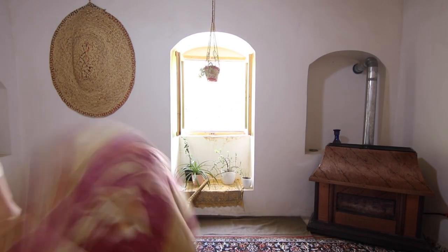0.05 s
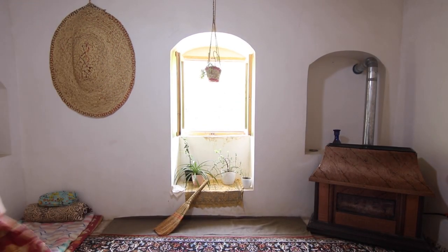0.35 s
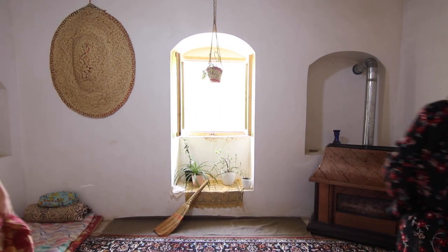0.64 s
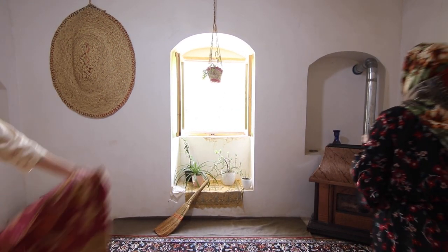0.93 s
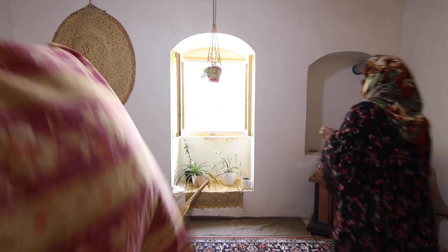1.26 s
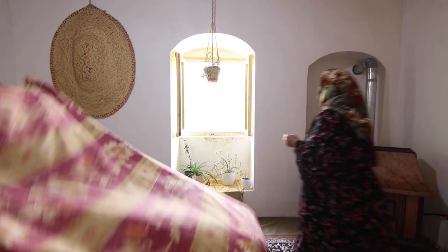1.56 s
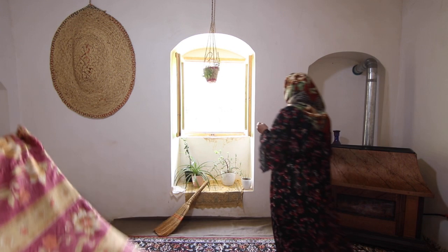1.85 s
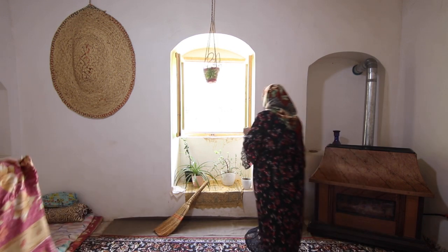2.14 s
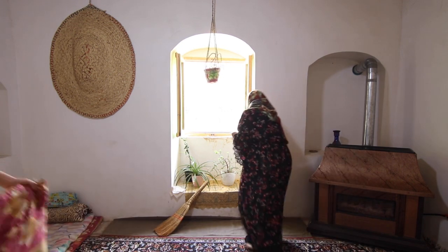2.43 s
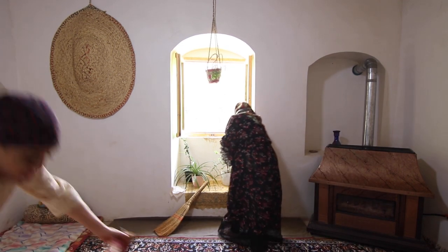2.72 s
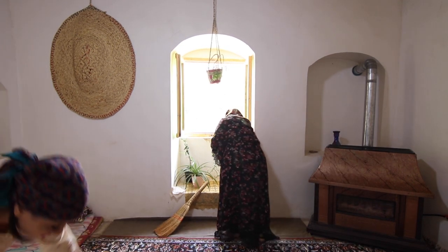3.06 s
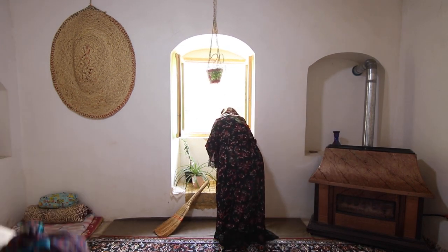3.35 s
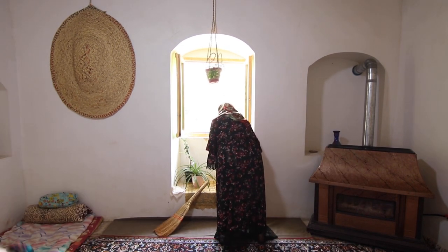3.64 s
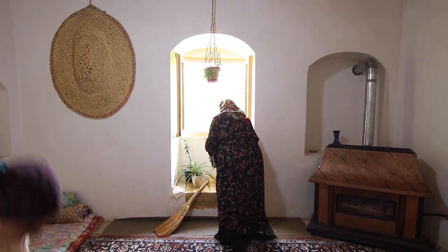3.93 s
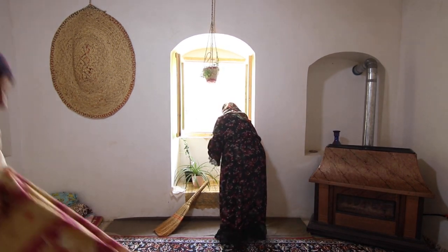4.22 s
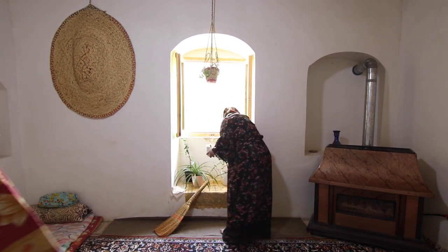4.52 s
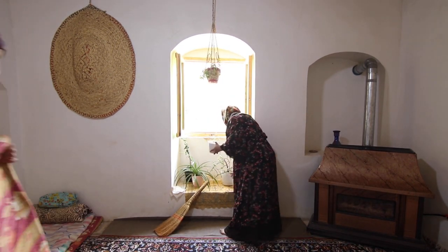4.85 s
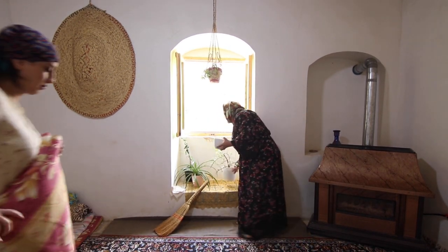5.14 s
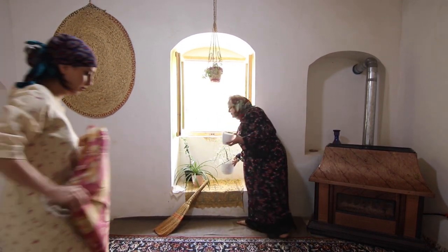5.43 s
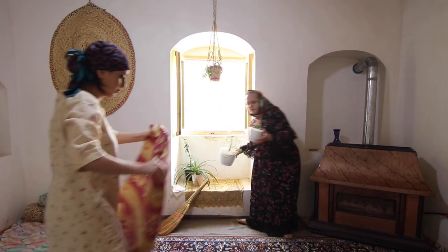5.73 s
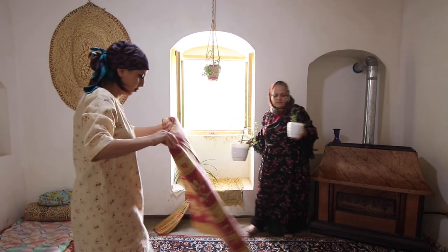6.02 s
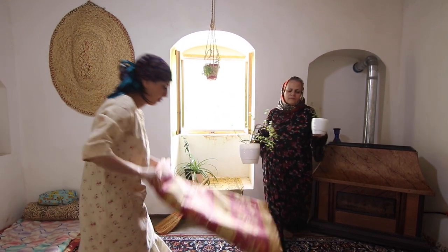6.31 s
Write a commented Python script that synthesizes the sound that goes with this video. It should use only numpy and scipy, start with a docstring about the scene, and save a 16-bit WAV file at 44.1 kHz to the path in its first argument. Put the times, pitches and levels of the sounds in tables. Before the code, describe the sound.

Several loud, padded thumps and a rush of air open the scene as thick bedding is shaken out, making a small room boom briefly. Fabric rubs and swishes in uneven strokes, with occasional dull thuds on carpet. Near the middle, a camera lens motor gives a short, dry whir with tiny clicks right at the microphone. The handling then grows gentler, ending in faint rustles and a soft footfall.

```python
"""In a small plastered room, a heavy quilt is swung, flapped and laid down on the carpet.
Friction makes the cloth rub and swish; its blows thud, push out air and excite the room's low modes,
and soft steps fall between. Halfway through, a small lens motor close to the microphone whirs and
clicks as its steps and gears drive the resonances of its housing."""
import sys
import numpy as np
from scipy import signal
from scipy.fft import rfft, irfft
from scipy.io import wavfile

SR = 44100
rng = np.random.default_rng(int(sys.argv[2]) if len(sys.argv) > 2 else 0)


def output_pcm(signal):
    """Save a mono or channel-first signal as 16-bit PCM at the path in sys.argv[1].

    Samples are clipped to [-1, 1] before scaling.
    """
    pcm = np.clip(np.atleast_2d(signal).T, -1, 1) * 32767
    wavfile.write(sys.argv[1], SR, np.round(pcm).astype(np.int16))


N = 285768
TIME = np.arange(N) / SR
HZ = np.fft.rfftfreq(N, 1 / SR)


def amp(db):
    """Decibels to amplitude ratio."""
    return 10 ** (np.asarray(db) / 20)


def unit(x):
    """Normalisation to rms 1."""
    return x / np.sqrt(np.mean(x ** 2) + 1e-20)


def curve_at(points, hz):
    """Interpolation on a log-frequency axis."""
    f, value = np.transpose(points)
    return np.interp(np.log(hz + 1), np.log(f + 1), value)


def coloured(x, spectrum):
    """Spectral shaping, at rms 1."""
    return unit(irfft(rfft(x) * amp(curve_at(spectrum, HZ)), N))


def wander(rate_hz):
    """Low-pass noise: slow random motion of rms 1."""
    return unit(irfft(rfft(rng.standard_normal(N)) * np.exp(-(HZ / rate_hz) ** 2), N))


def resonate(x, hz, width_hz):
    """A damped resonator with gain near 1 at its centre."""
    pole = np.exp(-np.pi * width_hz / SR)
    return 2 * signal.lfilter([1 - pole], [1, -pole * np.exp(2j * np.pi * hz / SR)], x).real


def band(x, hz, width_hz):
    """Two resonators in cascade: a band with steeper skirts."""
    return resonate(resonate(x, hz, width_hz), hz, width_hz)


def bell(f, centre_hz, octaves):
    """A Gaussian gain curve over log frequency."""
    return np.exp(-.5 * (np.log2(f / centre_hz) / octaves) ** 2)


def burst(rise_s, decay_s, colour, size=32768):
    """Shaped noise with exponential rise and decay; returns the time to its peak and the sound."""
    lead_s = size / SR / 4
    t = np.arange(size) / SR - lead_s
    gain = colour(np.fft.rfftfreq(size, 1 / SR) + 1)
    noise = unit(irfft(gain * np.exp(2j * np.pi * rng.random(len(gain)))))
    return lead_s, noise * np.exp(np.minimum(t / rise_s, -t / decay_s))


# Arm strokes that move the quilt: start_s, length_s, sweep_db, weave_db
ARM_STROKES = [(-0.08, 0.49, -38.5, -49), (0.06, 0.12, -41.5, -51.5), (0.38, 0.17, -47, -60),
               (0.603, 0.55, -62, -61), (0.856, 0.15, -49.5, -55.5), (1.018, 0.23, -54.5, -60),
               (1.225, 0.12, -46, -55.5), (1.42, 0.83, -57, -60), (1.916, 0.1, -43.5, -58),
               (1.937, 0.27, -59.5, -55.5), (2.383, 0.39, -64, -65), (3.603, 0.6, -58.5, -59.5),
               (3.858, 0.24, -49, -62.5), (4.288, 0.43, -56.5, -62.5), (4.514, 0.33, -57, -61),
               (4.906, 0.37, -61, -57), (5.3, 0.37, -70, -64), (5.677, 0.14, -61, -82)]
def stroke_levels(rise_s=0.077, coast_s=0.099, idle_sweep_db=-65, idle_weave_db=-73):
    """Incoherent sources add in power: overlapping strokes set the sweep and weave levels in dB."""
    sweep_power = amp(idle_sweep_db) ** 2  # held cloth is never quite still
    weave_power = amp(idle_weave_db) ** 2
    for start_s, length_s, sweep_db, weave_db in ARM_STROKES:
        t = TIME - start_s
        speed = np.clip(t / rise_s, 0, 1) * np.exp(-np.maximum(t - length_s, 0) / coast_s)
        sweep_power += (speed * amp(sweep_db)) ** 2
        weave_power += (speed * amp(weave_db)) ** 2
    return 10 * np.log10(sweep_power), 10 * np.log10(weave_power)


# Spectrum of folds sweeping the air: frequency_hz, density_db
FOLD_SPECTRUM = [(35, -18), (60, 5.5), (120, -6), (200, -2), (330, 2.5), (750, -1.5), (1300, -3),
                 (2500, -14.5), (5000, -26.5), (15000, -77)]
# Spectrum of the rubbing weave: frequency_hz, density_db
WEAVE_SPECTRUM = [(500, -20), (1500, 1.5), (3000, 2), (5300, -3), (7600, 0), (10000, -5), (13000, -7),
                  (15500, -22)]
def cloth_rustle(flutter_hz=45, snags_per_s=700, snag_spread_db=4, eddy_growth=1.96):
    """Flow noise and friction: fluttering folds sweep the air while the weave hisses and snags."""
    sweep_db, weave_db = stroke_levels()
    flutter_db = 1.46 * wander(flutter_hz)
    speed_db = sweep_db + flutter_db
    folds = coloured(rng.standard_normal(N), FOLD_SPECTRUM) * amp(speed_db)
    # only the fastest swings shed low eddies
    eddies = unit(band(rng.standard_normal(N), hz=130, width_hz=130))
    buffet = eddies * amp(-37 + eddy_growth * (speed_db - sweep_db.max()))
    snag_sizes = amp(snag_spread_db * np.minimum(rng.exponential(1, N), 4)) * rng.choice([-1, 1], N)
    snags = unit(snag_sizes * (rng.random(N) < snags_per_s / SR))
    fibres = coloured(rng.standard_normal(N) + 0.19 * snags, WEAVE_SPECTRUM)
    return folds + buffet + fibres * amp(weave_db + 2 + .5 * flutter_db)


# Cloth pulled taut: peak_s, level_db, decay_s, centre_hz
CLOTH_TUGS = [(0.22, -36.5, 0.0063, 5500), (0.343, -31, 0.0054, 4500), (1.993, -45, 0.041, 3500),
              (2.82, -50, 0.033, 8000), (3.047, -47, 0.03, 5500), (4.1, -56, 0.025, 13000),
              (4.52, -43, 0.011, 2600), (4.916, -40.5, 0.015, 4220)]
# Cloth sliding over cloth: peak_s, level_db, rise_s, decay_s
CLOTH_SLIDES = [(0.064, -46, 0.002, 0.016), (0.306, -46.5, 0.0018, 0.016), (0.368, -29.5, 0.0046, 0.014),
                (0.651, -48, 0.29, 0.0081), (0.98, -51.5, 0.075, 0.2), (1.62, -48.5, 0.012, 0.013),
                (2.25, -51.5, 0.58, 0.033), (5.54, -51, 0.0077, 0.06), (5.799, -56, 0.033, 0.04),
                (5.96, -54.5, 0.05, 0.019), (6.321, -63, 0.04, 0.04)]
def swishes(tug_octaves=2.2, slide_hz=1940, slide_octaves=0.88, soft_above_hz=13000):
    """Friction noise in short strokes: broad and bright in a tug, narrower and duller in a slide."""
    out = np.zeros(N)
    tugs = [(s, db, 0.97 * decay_s, decay_s, hz, tug_octaves) for s, db, decay_s, hz in CLOTH_TUGS]
    slides = [(*row, slide_hz, slide_octaves) for row in CLOTH_SLIDES]
    for peak_s, level_db, rise_s, decay_s, centre_hz, octaves in tugs + slides:
        def friction(f):
            """A tilted band with a treble roll-off: soft fibres give little fizz."""
            return bell(f, centre_hz, octaves) / f ** 0.52 / np.hypot(1, (f / soft_above_hz) ** 6)
        lead_s, sound = burst(rise_s, decay_s, friction)
        add(out, peak_s - lead_s, amp(level_db) * sound)
    return out


# Soft blows of bedding and feet: peak_s, level_db, rise_s, decay_s, cutoff_hz
SOFT_BLOWS = [(0.061, -31, 0.0018, 0.047, 734), (0.217, -18.5, 0.005, 0.011, 630),
              (0.23, -27, 0.002, 0.017, 800), (0.304, -26.5, 0.002, 0.014, 396),
              (0.368, -16, 0.0077, 0.0099, 517), (0.392, -23.5, 0.015, 0.039, 400),
              (1.998, -35, 0.025, 0.017, 850), (2.44, -56, 0.02, 0.071, 500),
              (3.02, -35, 0.0099, 0.035, 1000), (3.039, -27, 0.0047, 0.039, 700),
              (4.214, -36.5, 0.0012, 0.022, 1060), (4.24, -31.5, 0.0017, 0.015, 1018),
              (4.521, -41.5, 0.01, 0.027, 1310), (4.578, -48, 0.015, 0.027, 544),
              (4.921, -49.5, 0.0074, 0.024, 550), (6.469, -41.5, 0.0084, 0.04, 700)]
def thumps(low_hz=80, order=2.03, body_db=3, body_hz=560, body_octaves=0.66):
    """Cushioned impact: the padding cuts each blow's spectrum above its own cutoff; the quilt lands duller than
    feet and floor hits."""
    out = np.zeros(N)
    for peak_s, level_db, rise_s, decay_s, cutoff_hz in SOFT_BLOWS:
        def padding(f):
            """A hollow hump between a bass cut and the low-pass action of the padding."""
            body = amp(body_db * np.exp(-(np.log2(f / body_hz) / body_octaves) ** 2))
            return body / np.sqrt((1 + (f / cutoff_hz) ** (2 * order)) * (1 + (low_hz / f) ** 8))
        lead_s, sound = burst(rise_s, decay_s, padding)
        add(out, peak_s - lead_s, amp(level_db) * sound)
    return out


# Sharp knocks within the blows: peak_s, level_db, half_width_s, ring_db
FLOOR_KNOCKS = [(0.37, -8.5, 0.00063, -39.5), (3.0406, -20, 0.0002, -30.5), (4.239, -24, 0.00018, -55),
                (4.52, -26.5, 0.00014, -64)]
def knocks(floor_hz=166, floor_decay_s=0.035):
    """Impulse excitation: a hand or heel gives one pressure pulse, and the floor rings under it."""
    out = np.zeros(N)
    t = np.arange(-256, 256) / SR
    after = np.arange(SR // 2) / SR
    ring = np.sin(2 * np.pi * floor_hz * after) * np.exp(-after / floor_decay_s)
    for peak_s, level_db, half_width_s, ring_db in FLOOR_KNOCKS:
        pulse = (1 - (t / half_width_s) ** 2) * np.exp(-.5 * (t / half_width_s) ** 2)
        add(out, peak_s + t[0], amp(level_db) * pulse)
        add(out, peak_s, amp(ring_db) * ring)
    return out


# Air pushed out from under a falling weight: start_s, level_db, pitch_hz
AIR_PUSHES = [(0.073, -21, 152), (0.214, -30, 75.4), (0.365, -8, 191), (0.367, -16, 79.4), (1.56, -46, 87),
              (1.989, -32.5, 128), (3.039, -36, 93), (3.569, -46, 103), (4.22, -55, 56.4)]
def air_pushes(onset_s=0.0049, cycles_per_decay=2.23):
    """Damped oscillation: trapped air swings for a few cycles under each weight."""
    out = np.zeros(N)
    t = np.arange(SR // 2) / SR
    for start_s, level_db, pitch_hz in AIR_PUSHES:
        envelope = np.exp(-t * pitch_hz / cycles_per_decay) * (1 - np.exp(-t / onset_s))
        add(out, start_s, amp(level_db) * np.sin(2 * np.pi * pitch_hz * t) * envelope)
    return out


# Resonances of the motor's housing: centre_hz, width_hz, gain_db
HOUSING_MODES = [(896, 230, -0.5), (1416, 1410, -0.5), (1914, 140, 3), (2655, 440, 6.5), (2800, 560, 5),
                 (3760, 370, 0.5), (5700, 1000, -3.5), (6070, 470, -4), (7050, 580, -2.5),
                 (7600, 1500, -10), (10700, 2500, -24.5)]
# Runs of clicks where the gears catch: start_s, click_count, gap_s
GEAR_CATCHES = [(3.3995, 2, .0027), (3.4404, 1, 0), (3.4648, 2, .0027), (3.5132, 1, 0), (3.5511, 3, .0059),
                (3.5965, 3, .0059)]
def lens_motor(on_s=3.398, off_s=3.649, steps_per_s=180, step_decay_s=0.00093,
               whir_db=-42, step_db=-49, catch_db=-35, snap_db=-38.5, chirp_db=-62):
    """Forced vibration: scraping steps and catching gear teeth excite the modes of the housing."""
    running = np.clip(np.minimum(TIME - on_s, off_s - TIME) / 0.0024, 0, 1)
    since_step_s = ((TIME - on_s) * steps_per_s % 1) / steps_per_s
    steps = unit(np.exp(-since_step_s / step_decay_s) * rng.standard_normal(N))
    drive = running * (amp(whir_db) * rng.standard_normal(N) + amp(step_db) * steps)
    tap = signal.unit_impulse(1024)
    housing = sum(amp(db) * band(tap, hz, width_hz) for hz, width_hz, db in HOUSING_MODES)
    out = signal.oaconvolve(drive, housing / np.linalg.norm(housing))[:N]
    size = round(.002 * SR)  # a catching tooth chatters for 2 ms
    for start_s, click_count, gap_s in GEAR_CATCHES:
        for k in range(click_count):
            chatter = rng.standard_normal(size) * np.linspace(1, .5, size)
            click = np.convolve(chatter, housing)
            add(out, start_s + k * gap_s, amp(catch_db) * np.sqrt(size) * click / np.linalg.norm(click))
    # the gears take up their slack with one bright snap
    lead_s, snap = burst(0.0017, 0.0022, lambda f: bell(f, centre_hz=10500, octaves=0.37))
    add(out, on_s + 0.004 - lead_s, amp(snap_db) * snap)
    chirp = unit(band(steps, hz=13150, width_hz=1000))
    return out + amp(chirp_db) * running * chirp


# Low modes of the room: pitch_hz, gain_db, t60_s
LOW_MODES = [(53.3, 22, 1.9), (74.9, 8.5, 0.81), (96, 4, 0.73), (112.7, 6, 1.6), (133, 3, 0.23),
             (158, -21, 0.92), (197, 13, 0.68), (238.3, 10, 0.17), (309.8, 12, 0.29), (501.4, 7.5, 0.11)]
def standing_waves(x):
    """Modal resonance: the room rings on after a blow, longest where a mode is narrowest."""
    return sum(amp(db) * resonate(x, hz, np.log(1000) / np.pi / t60_s) for hz, db, t60_s in LOW_MODES)


# Reverberation time of the room: frequency_hz, t60_s
DECAY_TIMES = [(60, 0.63), (200, 0.78), (500, 0.36), (1500, 0.4), (4000, 0.21), (12000, 0.28)]
def reverb(x, first_reflection_s=0.0095):
    """Diffuse reverberation: dense reflections from the plaster, each band dying at its own rate."""
    hz, t, spectra = signal.stft(rng.standard_normal(SR), SR, nperseg=256)
    decay = amp(-60 * t / curve_at(DECAY_TIMES, hz)[:, None])
    tail = signal.istft(spectra * decay, SR, nperseg=256)[1]
    tail[:int(first_reflection_s * SR)] = 0
    return signal.oaconvolve(x, tail / np.linalg.norm(tail))[:N]


def moving_reverb(x, turns_hz=7, paths=4):
    """Multipath propagation: the moving cloth keeps finding other paths through the room."""
    shares = [np.cos(np.pi * (turns_hz * TIME + k / paths)) * np.sqrt(2 / paths) for k in range(paths)]
    return sum(reverb(x * share) for share in shares)


# Spectrum of still air and microphone hiss: frequency_hz, density_db
AIR_SPECTRUM = [(30, -35), (65, -3.5), (115, 7), (240, -1), (400, 3), (750, -2), (2200, -3), (3300, -7.5),
                (4700, -12), (6800, -11), (11000, -14), (15500, -19)]
# Faint narrow bands of noise: centre_hz, width_hz, level_db
DRONE_BANDS = [(52.7, 3.6, -71.5), (333.4, 42, -73), (2480, 67, -70.5), (6130, 160, -78)]
def background(air_db=-55.5):
    """Stationary noise: broadband air and microphone hiss with a few faint drones."""
    air = amp(air_db) * coloured(rng.standard_normal(N), AIR_SPECTRUM)
    return air + sum(amp(db) * unit(band(rng.standard_normal(N), hz, width_hz))
                     for hz, width_hz, db in DRONE_BANDS)


def add(mix, start_s, sound):
    """Superposition: a sound joins the mix at start_s."""
    start = round(start_s * SR)
    sound = sound[max(-start, 0):]
    part = mix[max(start, 0):][:len(sound)]
    part += sound[:len(part)]


def scene(direct_db=-2, wet_db=-5, rustle_wet_db=-14, push_wet_db=-16, blow_modes_db=-8):
    """Direct plus reverberant field: blows fill the room, rustle barely stirs it, the motor is dry."""
    blows = thumps() + knocks()
    air = air_pushes()
    rustle = cloth_rustle()
    strokes = swishes() + blows
    room = moving_reverb(amp(wet_db) * strokes + amp(push_wet_db) * air + amp(rustle_wet_db) * rustle)
    boom = standing_waves(air + amp(blow_modes_db) * blows)
    direct = rustle + amp(direct_db) * (strokes + air)
    return (direct + room + boom + lens_motor() + background())[None]


def record(dry, low_cut_hz=36, high_cut_hz=15750):
    """Band limiting: the microphone's bass roll-off, then a steep treble cut."""
    thinned = signal.sosfilt(signal.butter(3, low_cut_hz, "high", fs=SR, output="sos"), dry)
    low_pass = signal.firwin(511, high_cut_hz, window=("kaiser", 9), fs=SR)
    return signal.oaconvolve(thinned, low_pass[None], "same")


dry = scene()
out = record(dry)
output_pcm(out)
```